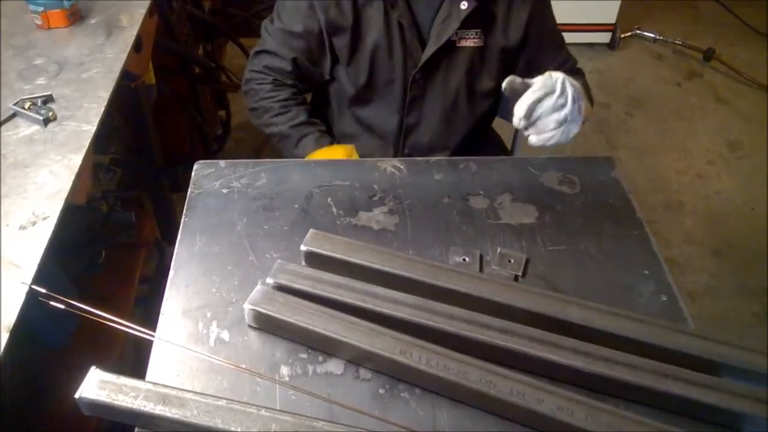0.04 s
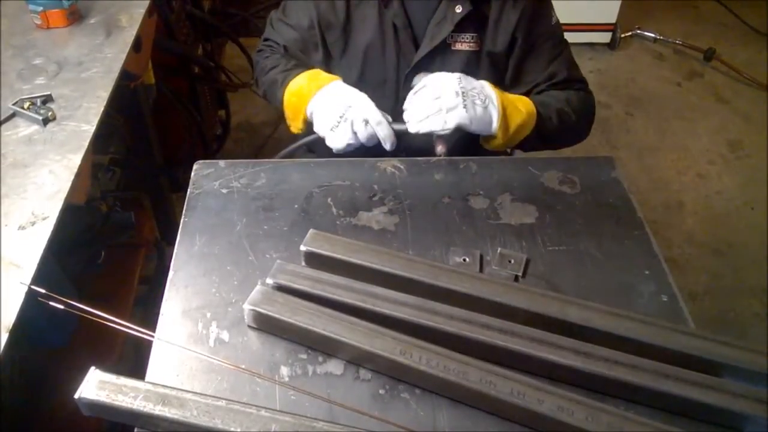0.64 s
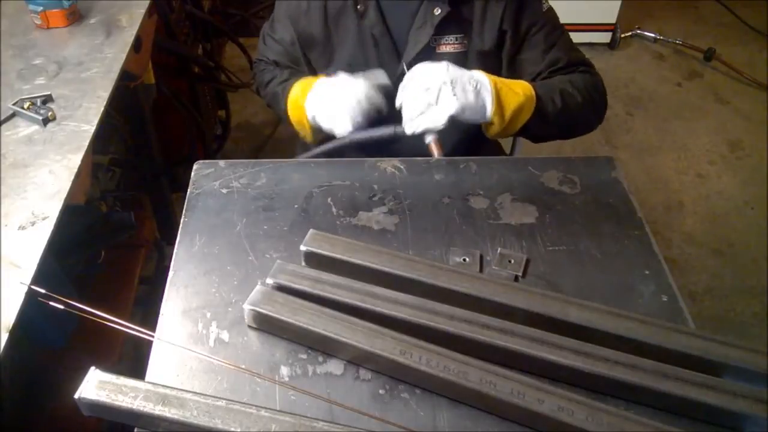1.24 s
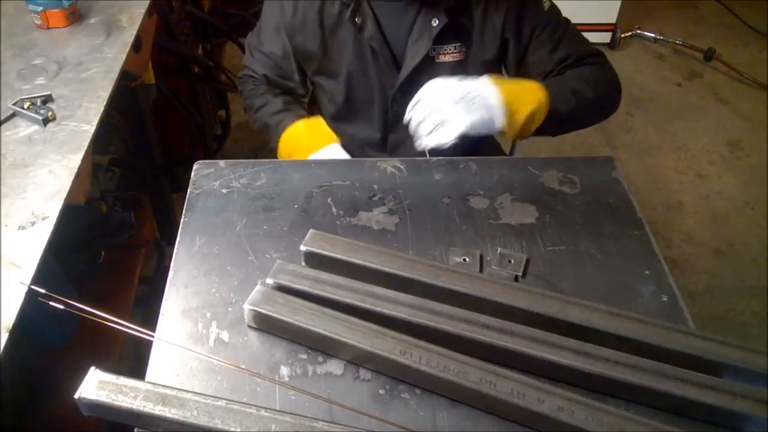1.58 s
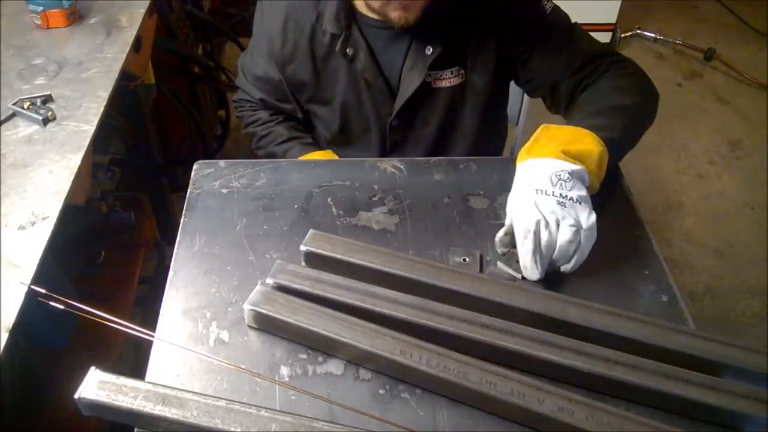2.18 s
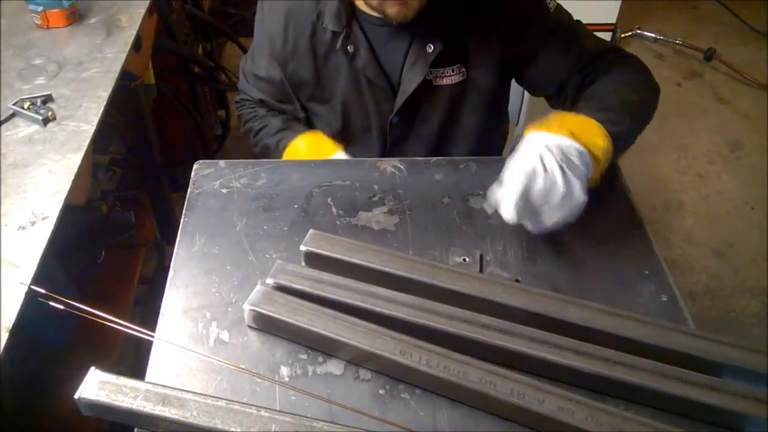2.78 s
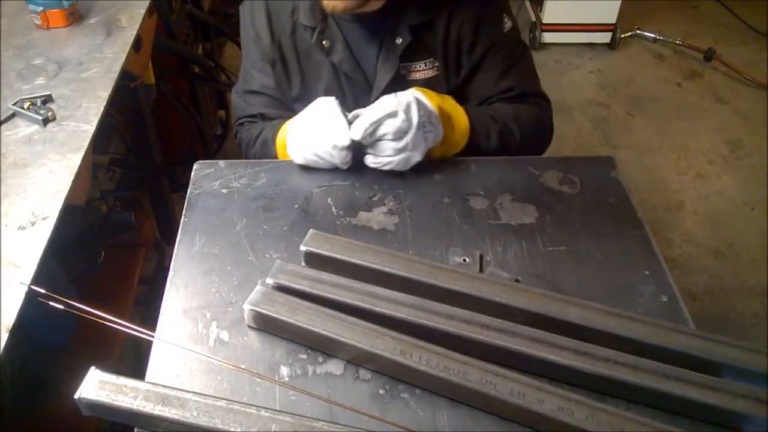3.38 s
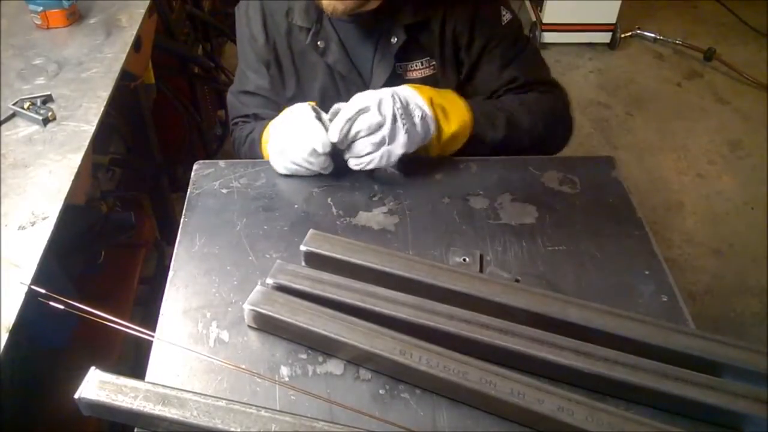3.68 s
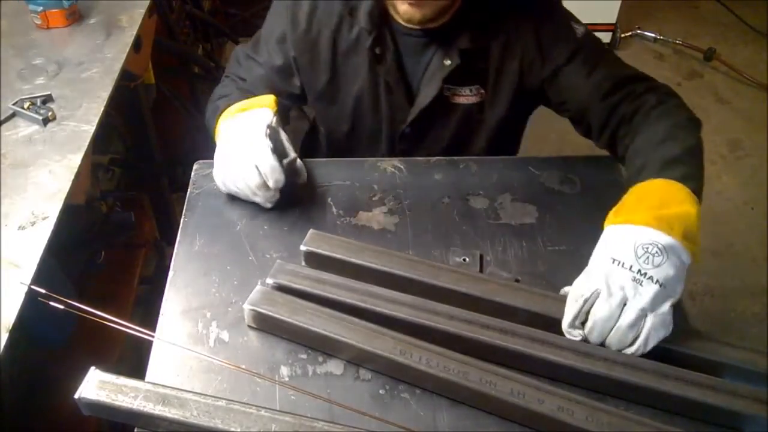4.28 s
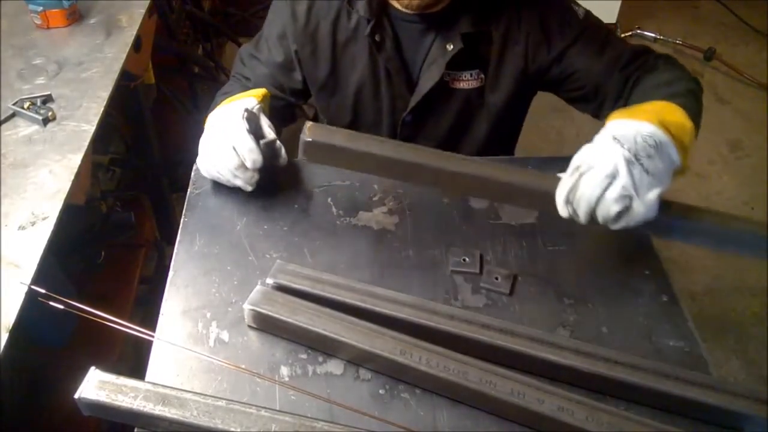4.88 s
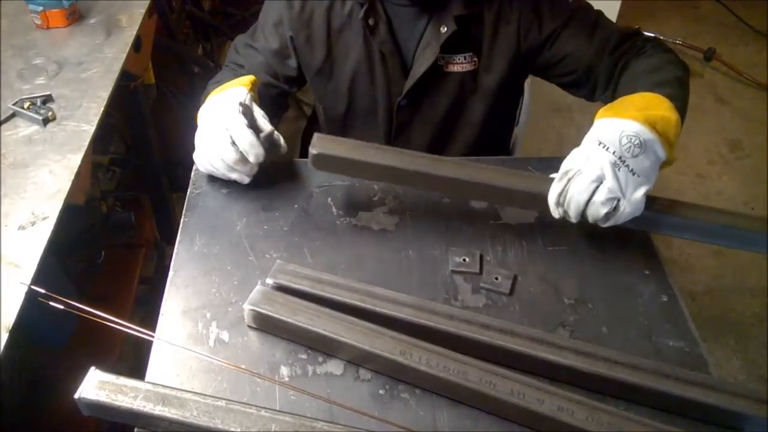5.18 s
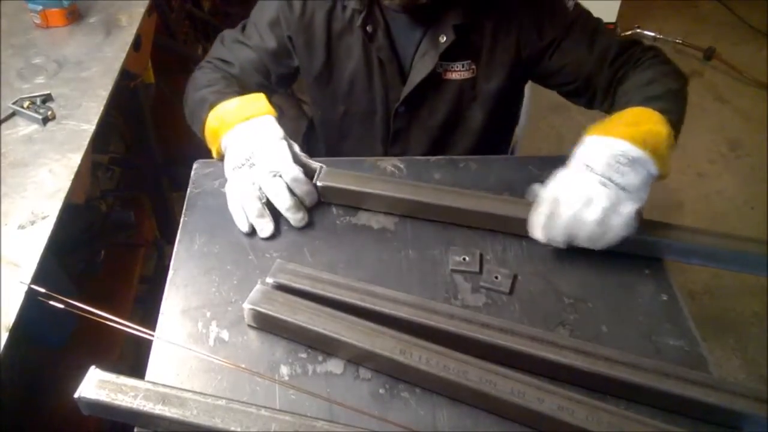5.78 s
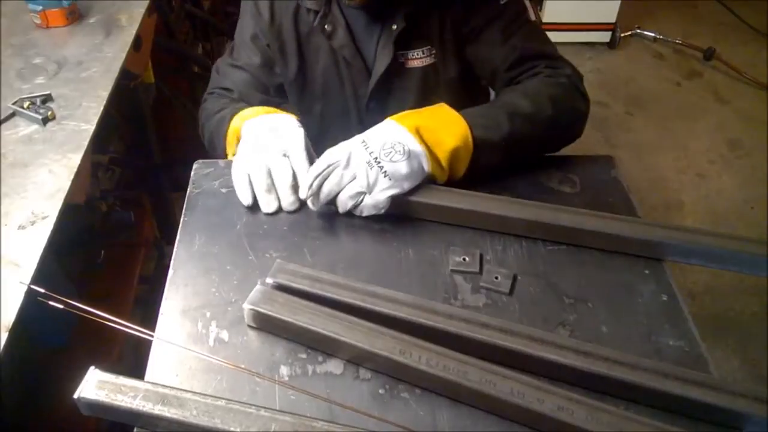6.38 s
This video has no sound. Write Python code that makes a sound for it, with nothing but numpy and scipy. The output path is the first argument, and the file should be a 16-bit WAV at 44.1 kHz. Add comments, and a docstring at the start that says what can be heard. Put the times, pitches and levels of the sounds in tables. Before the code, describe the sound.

A machine fan hums steadily in a slightly reverberant workshop. Leather gloves rustle softly and a welding torch taps a steel table with a short ring. After a pause come a dull bump and a faint clink, then two small steel plates drop in quick succession with loud, rattling clanks. A square steel tube then knocks and scrapes briefly as it is shifted, leaving only the hum. The microphone is near the table.

```python
"""Steel clanks on a steel table: a welder in leather gloves hangs up a torch, picks up small flat
plates, drops them, then shifts a square tube. Each blow sets the table top clanging and the piece
ringing in its own modes. Gloves rub and the tube scrapes in runs of tiny slips.
The workshop reverberates, a machine's fan hums behind it all, and an automatic gain control
ducks after the loudest clank."""
import sys
import numpy as np
from scipy import signal
from scipy.fft import rfft, irfft, next_fast_len
from scipy.io import wavfile
from scipy.ndimage import uniform_filter1d

SR = 44100
rng = np.random.default_rng(int(sys.argv[2]) if len(sys.argv) > 2 else 0)


def generate_wav(signal):
    """Clip the signal to [-1, 1] and save it as 16-bit WAV at the path in sys.argv[1]."""
    frames = np.transpose(np.atleast_2d(signal))
    scaled = np.clip(frames, -1, 1) * 32767
    pcm = np.round(scaled).astype(np.int16)
    wavfile.write(sys.argv[1], SR, pcm)


N = 293247
TIME_S = np.arange(N) / SR
RING_TIME_S = TIME_S[:SR]


def table_clang(level_db, tilt_db_oct, sizzle_db_oct, t60_s, modes_db, contact_s=0.00042):
    """One blow on the table top as (crash, tones): a crowd of short modes and a few lasting ones."""
    # freq_hz, density_db
    crash_spectrum = [(50, -22), (110, -2.5), (170, -21), (270, 3.5), (390, -9.5), (820, -1.5), (980, 0.5),
                      (1700, 2.5), (2900, -4), (4300, -8), (5800, -25), (8500, -28.5), (11000, -38.5),
                      (16000, -51)]
    # freq_hz, level_db, t60_s
    table_modes = [(242, -6, .46), (288, -7, .3), (549, -11, .38), (787, -4, .26), (839, 2.5, .4),
                   (1173, -5, .45), (1235, -7, .5), (1429, -6, .45), (1483, 0, .3), (1594, -4, .4),
                   (1640, 6, .11), (1658, -6, .35), (1718, 4, .17), (1771, -5, .4), (2148, -8, .45),
                   (2439, -9, .3), (2631, -1, .42), (2708, -12, .45), (3278, -12, .43)]

    def colour_db(hz):
        return tilt_db_oct * np.log2(np.clip(hz, 70, 6000) / 2000) + sizzle_db(hz, sizzle_db_oct)

    def crash_gain(hz):
        shape_db = at_hz(crash_spectrum, hz) + colour_db(hz)
        return crowd_of_modes(hz) * from_db(shape_db) / (1 + (70 / hz) ** 4)

    crash = noise(crash_gain, SR) * decay(t60_s)
    tones = ring([(hz, db + colour_db(hz), mode_t60_s) for hz, db, mode_t60_s in table_modes])
    force_rise = (1 - np.exp(-RING_TIME_S / contact_s)) ** 2
    return from_db(level_db) * np.array([force_rise * crash, from_db(modes_db) * tones])


def crowd_of_modes(hz, spread_db=3.6, spacing=0.009, knee_hz=2500):
    """Gain of dense resonances: each contact point favours some and misses others."""
    slot = np.log1p(hz / knee_hz) / spacing
    strengths_db = spread_db * np.clip(rng.standard_normal(int(slot.max()) + 2), -2, 2)
    return from_db(np.interp(slot, np.arange(len(strengths_db)), strengths_db))


def sizzle_db(hz, slope_db_oct, knee_hz=6500):
    """Treble slope above a knee: harder contacts reach the highest modes."""
    return slope_db_oct * np.log2(1 + (hz / knee_hz) ** 4) / 4


def ring(modes, swell=0.26, swell_s=0.0088, contact_s=0.000303):
    """Struck modes: decaying sines that swell as they fill the room."""
    tones = sum(from_db(db) * decay(t60_s) * np.sin(2 * np.pi * hz * RING_TIME_S)
                for hz, db, t60_s in modes)
    filling = 1 + swell * (1 - np.exp(-RING_TIME_S / swell_s))
    return tones * filling * (1 - np.exp(-RING_TIME_S / contact_s))


def rebound(blow, tilt_db_oct, delay_s, clang_step_db, tilt_step_db_oct, ring_step_db):
    """A blow and its briefer, hence brighter, rebound, as two contacts."""
    start_s, clang_db, sizzle_db_oct, t60_s, ring_db = blow
    return [(start_s, clang_db, tilt_db_oct, sizzle_db_oct, t60_s, ring_db),
            (start_s + delay_s, clang_db + clang_step_db, tilt_db_oct + tilt_step_db_oct,
             sizzle_db_oct + 10, t60_s, ring_db + ring_step_db)]


def rocking(blow, period_s=0.047, jitter_s=0.002, tilt_db_oct=2.5, t60_s=0.29):
    """Two lighter contacts as a plate tips from side to side."""
    start_s, clang_db, sizzle_db_oct, _, ring_db = blow
    times_s = start_s + np.cumsum(period_s + jitter_s * rng.uniform(-1, 1, 2))
    return [(s, clang_db - 10.5, tilt_db_oct, sizzle_db_oct, t60_s, ring_db - 6.5) for s in times_s]


def plates(ring_gain_db=-9, flat_s=4.125, smother_db_per_s=65):
    """Plates clink, drop and rock; the contact place weights their modes, lying flat smothers them."""
    # start_s, clang_db, sizzle_db_oct, t60_s, ring_db, place (0 edge, 1 face)
    plate_blows = [(3.060, -32.5, -9, 0.16, -17, .03), (3.956, -3.5, -18, .08, -9, 0.85),
                   (4.101, -3.5, -6, 0.21, -19, 0.85)]
    # freq_hz, edge_db, face_db, t60_s; one close pair beats
    plate_modes = [(2273, -30, 1, .5), (2320, -30, -1, .5), (3488.5, -14, 6, .95), (3543, -24, -3.5, .7),
                   (3673, -4, -8, .6), (3783, -1.5, -13, .7), (3788.6, -3, -11, .7), (4403, -2.5, -2, .3),
                   (4759, -9, -22, .22), (5052, -10, -21, .26), (5922, -19, -31, .3)]

    def smother(s):
        return from_db(-smother_db_per_s * np.maximum(s - flat_s, 0))

    out, ringing = np.zeros((2, N)), np.zeros(N)
    for *blow, place in plate_blows:
        modes = [(hz, edge + place * (face - edge), t60_s) for hz, edge, face, t60_s in plate_modes]
        contacts = rebound(blow, tilt_db_oct=10 - 10.5 * place, delay_s=0.014,   # edge is brighter
                           clang_step_db=-11, tilt_step_db_oct=6.5, ring_step_db=-29)
        if place > 0.5:
            contacts += rocking(blow)
        for start_s, *strike, ring_db in contacts:
            add(out, start_s, smother(start_s) * table_clang(*strike, modes_db=-15))
            add(ringing, start_s, from_db(ring_db + ring_gain_db) * ring(modes))
    out[1] += ringing * smother(TIME_S)
    return out


def rim_blows(blows, modes, ring_gain_db, **landing):
    """Steel knocks near the table's stiff rim and rebounds; mostly the piece rings."""
    out = np.zeros((2, N))
    for blow in blows:
        for start_s, clang_db, tilt_db_oct, sizzle_db_oct, t60_s, ring_db in rebound(blow, **landing):
            add(out, start_s, table_clang(clang_db, tilt_db_oct, sizzle_db_oct, t60_s, modes_db=-24))
            excited = [(hz, db + sizzle_db(hz, sizzle_db_oct), decay_s) for hz, db, decay_s in modes]
            add(out[1], start_s, from_db(ring_db + ring_gain_db) * ring(excited))
    return out


def torch():
    """The torch taps the table and rings as it is hung up."""
    # start_s, clang_db, sizzle_db_oct, t60_s, ring_db
    torch_blows = [(.951, -31.5, -25, 0.21, -44), (1.034, -12, -7.5, 0.18, -15.5)]
    # freq_hz, level_db, t60_s
    torch_modes = [(524.4, -5, 0.26), (1004, 0.5, 0.27), (1207, -8, 0.33), (1700, -5, 0.18),
                   (1870, -9, 0.28), (2466, -13, 0.24), (3055, 9, 0.32), (3280, -14, 0.13),
                   (3800, -25, 0.18), (4100, -11, .45), (4230, -27, 0.38), (4300, -14, 0.46),
                   (4940, 1.5, 0.19), (5730, -5.5, 0.24), (6700, -16, .2), (7400, -16, 0.22),
                   (9884, -34, .15), (13000, 1, .11)]
    return rim_blows(torch_blows, torch_modes, ring_gain_db=-20, tilt_db_oct=6.5,
                     delay_s=0.015, clang_step_db=-21, tilt_step_db_oct=8, ring_step_db=1)


def tube():
    """The square tube knocks and rings as it is shifted."""
    # start_s, clang_db, sizzle_db_oct, t60_s, ring_db
    tube_blows = [(4.432, -22.5, -17.5, 0.16, -18), (4.896, -30, -11, .28, -15.5),
                  (4.972, -18.5, 8, 0.16, -1.5), (5.146, -41, -16, 0.11, -27)]
    # freq_hz, level_db, t60_s
    tube_modes = [(597, -8, 0.054), (1200, -21, 0.15), (1680, -17, 0.086), (1887, -8.5, 0.078),
                  (2293, -10, 0.28), (3260, -18, 0.26), (3506, -11, 0.3), (3690, 10, 0.05), (4000, 0, 0.09),
                  (4670, -18, 0.2), (4800, -12.5, 0.22), (4770, -12, 0.16), (5130, -17, 0.21),
                  (5910, -12.5, 0.15), (6860, -17, 0.064), (7170, -19.5, 0.27), (8360, -20, 0.11),
                  (8160, -16, 0.11), (8660, -18, .12), (9620, -20, 0.33), (10600, -24, 0.12),
                  (12300, -27, 0.068), (13040, -27, 0.089), (13850, -27, .08), (14860, -29, .09)]
    return rim_blows(tube_blows, tube_modes, ring_gain_db=-14.5, tilt_db_oct=3.5,
                     delay_s=0.012, clang_step_db=-3, tilt_step_db_oct=6.5, ring_step_db=-12)


def tube_scrapes():
    """The sliding tube excites a few resonances."""
    # start_s, length_s, level_db
    strokes = [(4.59, 0.086, -33), (4.8, 0.051, -37), (4.935, 0.043, -26), (5.43, 0.039, -36.5)]
    # centre_hz, nominal_width_hz, level_db
    scrape_peaks = [(1215, 60, -2), (1473, 34, -0.5), (1712, 100, -1.5), (2054, 130, -6.5),
                    (2560, 360, -18.5), (3390, 570, -13.5)]

    def body_gain(hz):
        return sum(from_db(db) * resonance(hz, centre_hz, 2 * width_hz) ** 3
                   for centre_hz, width_hz, db in scrape_peaks)

    return friction(strokes, body_gain, slips_per_s=4000)


def glove_knocks():
    """A gloved hand bumps the table dully."""
    # start_s, level_db
    bumps = [(2.985, -31)]
    out = np.zeros((2, N))
    for start_s, db in bumps:
        add(out, start_s, table_clang(db, tilt_db_oct=-5, sizzle_db_oct=-26, t60_s=0.39, modes_db=-23.5))
    return out


def glove_rubs():
    """Sliding leather gives a soft, broad rustle."""
    # start_s, length_s, level_db
    strokes = [(.565, 0.077, -37), (.68, 0.065, -40.5), (2.905, 0.066, -40), (2.98, 0.029, -35.5)]
    # freq_hz, density_db
    leather_spectrum = [(200, 7.5), (700, -1), (1600, 2.5), (2800, -0.5), (4000, -3), (6000, -35),
                        (12000, -53)]
    return friction(strokes, lambda hz: from_db(at_hz(leather_spectrum, hz)), slips_per_s=5000)


def friction(strokes, gain_at, slips_per_s):
    """Each stroke swells and fades as a run of tiny slips that excite a body."""
    envelope = np.zeros(N)
    for start_s, length_s, level_db in strokes:
        add(envelope, start_s, from_db(level_db) * np.sqrt(np.abs(np.hanning(int(length_s * SR)))))
    slips = (rng.random(N) < slips_per_s / SR) * rng.standard_normal(N)
    return envelope * unit_rms(filtered(slips, gain_at, next_fast_len(N))[:N])


def workshop(x, first_echo_s=0.008):
    """Diffuse reflections follow a short gap; the top treble dies first."""
    # freq_hz, t60_s
    room_decay = [(100, 0.55), (500, 0.28), (2000, 0.48), (4500, 0.43), (8000, 0.24), (15000, 0.2)]
    # freq_hz, gain_db re direct sound
    room_gain = [(100, 7), (1500, -6.5), (4000, -1), (8000, -1), (14000, -0.5)]
    white = rng.standard_normal(SR)
    centres_hz = np.geomspace(100, 15000, 9)
    tail = np.zeros(SR)
    for centre_hz, share in zip(centres_hz, np.eye(len(centres_hz))):
        band = filtered(white, lambda hz: np.interp(np.log(hz), np.log(centres_hz), share), SR)
        fade = decay(at_hz(room_decay, centre_hz)) * (RING_TIME_S > first_echo_s)
        tail += from_db(at_hz(room_gain, centre_hz)) * band * fade / np.linalg.norm(fade)
    return signal.fftconvolve(x, tail)[:N]


def fan(air_db=-39.5, waver_depth=0.25, waver_hz=3):
    """Rushing air, air-driven resonances and a wavering blade tone."""
    # freq_hz, density_db
    air_spectrum = [(20, -8.5), (70, 0), (135, 2), (170, -6), (240, -6.5), (310, 1.5), (480, -7),
                    (1350, -11.5), (2000, -17.5), (2900, -21), (4100, -20), (5800, -41), (9500, -54.5),
                    (16000, -56)]
    # centre_hz, nominal_width_hz, level_db
    drones = [(205, 8.2, -47), (427, 3.8, -53.5), (1443, 14, -60.5)]
    # pitch_hz, level_db
    blade_tones = [(274.5, -44)]
    size = next_fast_len(N)
    out = from_db(air_db) * noise(lambda hz: from_db(at_hz(air_spectrum, hz)), size)[:N]
    for centre_hz, width_hz, level_db in drones:
        out += from_db(level_db) * noise(lambda hz: resonance(hz, centre_hz, 2 * width_hz) ** 2, size)[:N]
    for pitch_hz, level_db in blade_tones:
        swell, sway_rad = (waver_depth * noise(lambda hz: 1 / (1 + (hz / waver_hz) ** 2), size)[:N]
                           for _ in range(2))
        tone = np.sqrt(2) * np.sin(2 * np.pi * pitch_hz * TIME_S + sway_rad)
        out += from_db(level_db) * (1 + swell) * tone
    return out


def from_db(db):
    """Decibels to gain."""
    return 10 ** (np.asarray(db) / 20)


def unit_rms(x):
    """Scale to unit power."""
    return x / np.sqrt(np.mean(x ** 2) + 1e-20)


def at_hz(points, hz):
    """Read a table on a log-frequency axis."""
    points = np.array(points)
    return np.interp(np.log(hz + 1e-9), np.log(points[:, 0]), points[:, 1])


def decay(t60_s):
    """Envelope losing 60 dB in t60_s."""
    return np.exp(-np.log(1000) * RING_TIME_S / t60_s)


def filtered(x, gain_at, size):
    """Weight a spectrum by gain_at(hz)."""
    hz = np.fft.rfftfreq(size, 1 / SR) + 1
    return irfft(rfft(x, size) * gain_at(hz), size)


def noise(gain_at, size):
    """Unit-power coloured noise."""
    return unit_rms(filtered(rng.standard_normal(size), gain_at, size))


def resonance(hz, centre_hz, width_hz):
    """Gain of one resonance, 1 at its peak."""
    return 1 / np.hypot(1, (hz ** 2 - centre_hz ** 2) / (hz * width_hz))


def add(track, start_s, sound):
    """Mix a sound in at start_s."""
    at = int(round(start_s * SR))
    track[..., at:at + sound.shape[-1]] += sound[..., :N - at]


def scene(tone_send_db=-6):
    """Steel and gloves in the workshop, over the fan."""
    crash, tones = torch() + glove_knocks() + plates() + tube()
    noises = crash + glove_rubs() + tube_scrapes()
    reverb = workshop(noises + from_db(tone_send_db) * tones)
    return (noises + tones + reverb + fan())[None]


def record(dry, threshold_db=-11, release_db_per_s=1.09, attack_s=0.00056, window_s=0.032):
    """Gain drops on loud clanks and creeps back; peaks are rounded and the top is cut."""
    power = uniform_filter1d(dry[0] ** 2, int(window_s * SR))
    excess_db = np.maximum(10 * np.log10(np.abs(power) + 1e-12) - threshold_db, 0)
    release_db = release_db_per_s * TIME_S
    held_db = np.maximum.accumulate(excess_db + release_db) - release_db
    pole = np.exp(-1 / (attack_s * SR))
    levelled = dry * from_db(-signal.lfilter([1 - pole], [1, -pole], held_db))
    rounded = levelled / (1 + levelled ** 6) ** (1 / 6)
    top_cut = signal.ellip(10, 0.1, 80, 15900, fs=SR, output="sos")
    return signal.sosfilt(top_cut, rounded)


dry = scene()
out = record(dry)
generate_wav(out)
```